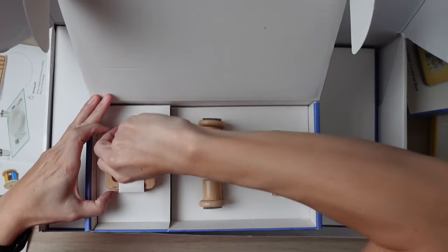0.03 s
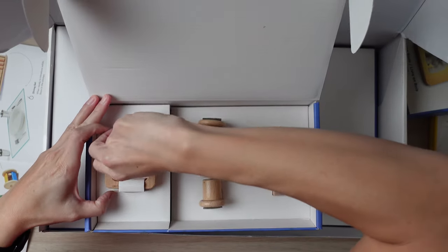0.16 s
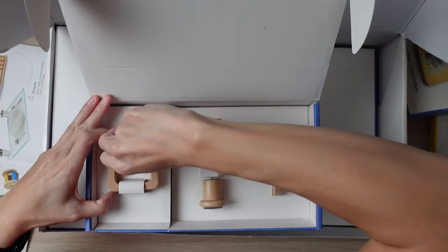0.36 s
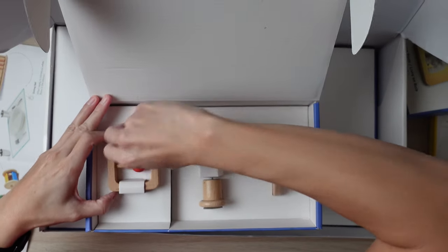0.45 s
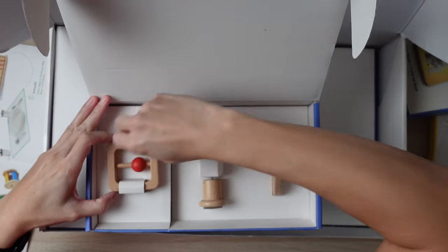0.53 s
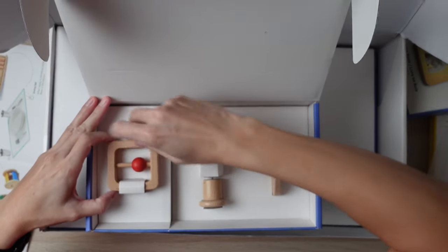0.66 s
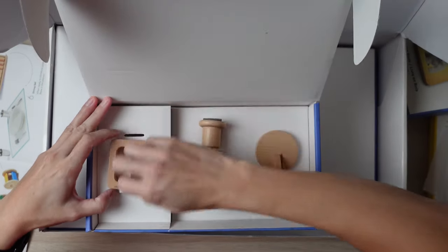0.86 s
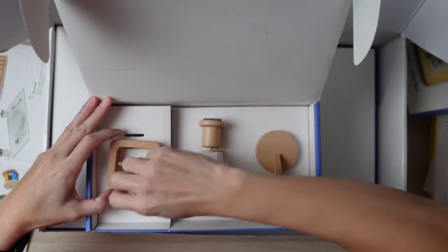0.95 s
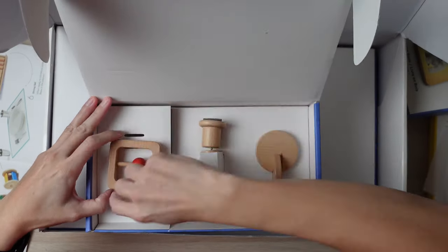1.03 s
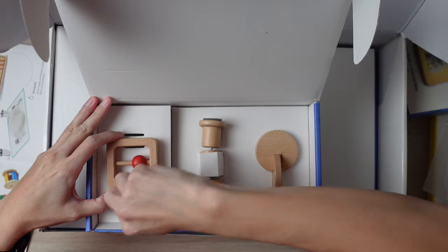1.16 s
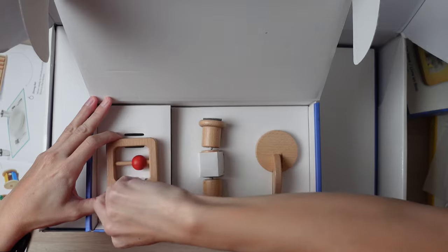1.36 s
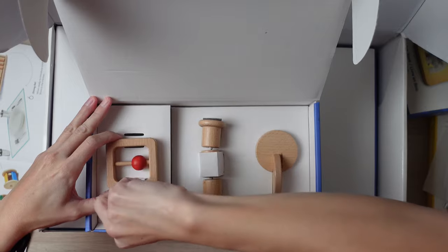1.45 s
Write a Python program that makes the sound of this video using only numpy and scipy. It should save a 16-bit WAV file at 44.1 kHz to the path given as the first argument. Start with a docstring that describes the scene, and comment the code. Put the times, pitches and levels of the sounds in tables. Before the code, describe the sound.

A wooden toy is worked against a tight cardboard slot: faint taps near 0.07 s, then a dense, loud burst of scraping and sharp woody clacks from 0.17 to 0.28 s. Hollow box knocks and a low wobble follow until 0.7 s. Dry, grainy finger brushes run from 0.4 to 1.25 s, firmest around 0.7 and 0.97 s. Another bump comes at 1.12 s, a tiny tick at 1.36 s, over quiet room rumble.

```python
"""Small room, close by: a wooden rattle is worked against the tight slot of a cardboard box insert.
Clacks and scrapes drive the toy's decaying modes, with coloured noise for torn and crushed card.
The box wobbles (slow sine, low noise) and gives hollow knocks (panel and box modes).
Fingers brush the card (resonant, grainy noise) and the box is bumped again.
A hand rustles on the box and the room rumbles quietly (coloured noise)."""
import sys
import numpy as np
from scipy import signal
from scipy.fft import rfft, irfft
from scipy.io import wavfile
from scipy.ndimage import uniform_filter1d

SR = 44100
rng = np.random.default_rng(int(sys.argv[2]) if len(sys.argv) > 2 else 0)


def wrap_up_sound(samples):
    """Save the sound to the file named by the first command line argument, as 16-bit audio."""
    columns = np.atleast_2d(samples).T
    # keep every value between -1 and 1, then stretch to whole-number steps
    tamed = np.clip(columns, -1, 1)
    steps = np.round(tamed * 32767).astype(np.int16)
    wavfile.write(sys.argv[1], SR, steps)


N = 66150
TIME_S = np.arange(N) / SR

# Spectra: noise is scaled to unit rms, so their levels are relative.
# room rumble: [f/Hz, level/dB]
FLOOR_SPECTRUM = [(20, -9), (60, 12), (110, -7), (250, -18.5), (1000, -36), (4000, -38), (16000, -36.5)]
FLOOR_DB = -47

# hand shifting on the box: [t/s, level/dB]
HANDLING_LEVEL = [(0, -50.5), (.3, -43), (.66, -52.5), (.76, -46.5), (.785, -40.5), (.81, -56.5),
                  (1.09, -65), (1.15, -48), (1.315, -51), (1.36, -53.5), (1.5, -47.5)]
# colour of its rustle: [f/Hz, level/dB]
RUSTLE_SPECTRUM = [(100, 6.5), (220, -4.5), (400, 1), (1100, -2), (2200, -12.5), (4000, -12.5),
                   (7000, -27.5), (16000, -41.5)]

# wobble of the box: [t/s, level/dB]
WOBBLE_LEVEL = [(0, -41.5), (.12, -31), (.24, -56), (.275, -13), (.36, -16), (.45, -24), (.6, -33.5),
                (.74, -38), (1.08, -47), (1.24, -32.5), (1.29, -45.5), (1.5, -41.5)]
# stirred air: [f/Hz, level/dB]
AIR_SPECTRUM = [(20, -15), (58, 23), (85, -7.5), (300, -51)]
SWAY_HZ, SWAY_WANDER_RMS_HZ = 29.9, 1
SWAY_DB, AIR_DB = -5.5, -6

# finger strokes: [start t/s, length/s, mid-stroke level/dB, swell over stroke/dB, low-pass f/Hz]
BRUSH_STROKES = [(0.393, 0.07, -46.5, -17, 7700), (0.496, .022, -43.5, -25, 6600),
                 (0.55, 0.032, -46, -6, 11500), (0.6, 0.047, -49, -21, 11900),
                 (0.652, 0.064, -43, 6, 12900), (0.714, 0.012, -26, -11, 4500),
                 (0.733, 0.13, -47, -1, 6500), (0.837, 0.058, -42, -3.5, 10010),
                 (0.908, 0.055, -39.5, 7.5, 8600), (0.964, 0.019, -30, 10, 7400),
                 (0.986, 0.024, -41.5, 7, 9000), (1.037, 0.046, -45.5, -5.5, 6500),
                 (1.093, 0.17, -48.5, -12, 4920)]
# friction of skin on card: [f/Hz, level/dB]
SKIN_SPECTRUM = [(1200, -5), (2600, -14), (4100, -9), (5400, -2), (7000, -4), (8300, -1), (10500, -6),
                 (16000, 0)]
# resonance of the gap between hand and card: [t/s, f/Hz]
GAP_RESONANCE = [(.86, 3400), (.965, 2700), (1.05, 2460)]
GAP_Q = 3.67
BRUSH_ATTACK_S, BRUSH_RELEASE_TAU_S, BRUSH_GRAIN_DB = 0.013, 0.0059, 1.5
CHATTER_HZ, CHATTER_Q, CHATTER_DB = 5360, 6.6, 4.5

# knocks on the box: [t/s, level/dB, nominal panel f/Hz, low-pass f/Hz, panel t60/s]
BOX_KNOCKS = [(0.0657, -28.5, 3260, 7540, 0.0071), (0.067, -27, 556, 2510, 0.023),
              (0.27, -15.5, 610, 2480, 0.011), (0.3217, -18, 658, 1950, 0.0087),
              (0.3556, -23, 1016, 4600, 0.025), (0.36, -17, 570, 2940, 0.038),
              (0.365, -22, 373, 1770, 0.061), (0.4038, -23.5, 930, 1940, 0.0078),
              (0.5151, -14.5, 1145, 2050, 0.016), (0.5969, -23, 904, 1930, 0.016),
              (.6005, -27, 360, 1000, 0.017), (0.693, -41, 188, 800, 0.051),
              (1.1212, -20.5, 953, 4340, 0.02), (1.1250, -27, 340, 1680, 0.041),
              (1.1416, -27.5, 1070, 1990, 0.0092), (1.355, -32.5, 3600, 4900, .008)]
# modes of the box: [nominal f/Hz, level/dB, t60/s]
BOX_MODES = [(322, -23, 0.097), (375, -17, 0.11), (460, -31.5, 0.096), (570, -11.5, 0.025),
             (675, -23.5, 0.18), (824, -21, 0.07)]
# overtones of a card panel: [multiple of panel f, level/dB]
PANEL_OVERTONES = [(1.6, -16), (2.2, -11), (3.1, -15.5)]
PANEL_DB, TAP_DB, TAP_T60_S = 0.5, -7, 0.032

# crushed and scraped card: [f/Hz, level/dB]
CARD_SPECTRUM = [(200, -22), (500, 0.5), (1600, -1.5), (2400, -7), (4800, -9.5), (9200, -18), (10800, -28),
                 (16000, -17.5)]
# modes of the toy wedged in the card: [nominal f/Hz, level/dB, t60/s]
TOY_MODES = [(150, -29, 0.06), (645, -14, 0.035), (1040, -11.5, 0.016), (1600, -8, 0.013),
             (1970, -20, 0.012), (3690, -17, 0.008), (4920, -22, 0.009), (8730, -23, 0.004)]
DETUNE_MAX = 0.034  # +/- share by which modes shift per blow as the grip changes

# force of wood scraping on card: [t/s, level/dB]
SCRAPE_FORCE = [(0, -42.5), (.09, -68), (.118, -36), (.15, -97.5), (.171, -27.5), (.203, -35), (.216, -26),
                (.243, -21.5), (.272, -16.5), (.288, -29.5), (.315, -32), (.49, -72)]
SLIPS_PER_S, SLIP_SPREAD_DB, SCRAPE_LOWPASS_HZ = 1800, 2.5, 11500
GRIT_DB, GRIT_RISE_DB_PER_DB = -2, 0.2  # harder scraping tears more fibres

# wood catches and strikes: [t/s, level/dB, knock f/Hz, low-pass f/Hz]
WOOD_CLACKS = [(.1755, -15.5, 1660, 3030), (.2124, -7.5, 1450, 3200), (0.2143, -2, 1520, 10950),
               (0.2160, -2.5, 950, 2000), (.2194, -8.5, 680, 2000), (.2338, -12.5, 1420, 3000),
               (.2366, 3, 1560, 11800), (0.2385, -8.5, 1870, 4900), (.2443, -13.5, 1240, 8000),
               (.2490, -8.5, 1120, 3000), (.2555, -13, 930, 2500), (.2585, -13, 1300, 11240),
               (0.265, -7.5, 1890, 13900), (.2663, -6, 1065, 5950), (.2767, -7.5, 1360, 2520)]
CRACK_DB, CRACK_T60_S, CLACK_T60_S = -2.5, 0.014, 0.011

ROOM_T60_S, ROOM_DB, ROOM_LOWPASS_HZ, ROOM_DELAY_S = 0.12, -16, 4930, 0.004
CUTOFF_HZ, CLIP_LEVEL = 15750, 0.88


def from_db(db):
    """Decibels to gain."""
    return 10 ** (np.asarray(db) / 20)


def rms_one(x):
    """Scale to unit rms."""
    return x / np.sqrt(np.mean(x ** 2))


def energy_one(x):
    """Scale to unit energy."""
    return x / np.sqrt(np.sum(x ** 2))


def interpolate(at, points):
    """Linear interpolation between (x, y) points."""
    return np.interp(at, *np.transpose(points))


def level(points):
    """Gain over time from [t/s, level/dB]."""
    return from_db(interpolate(TIME_S, points))


def fade(t60_s):
    """Exponential decay, -60 dB at t60."""
    return np.exp(-np.log(1000) * TIME_S / t60_s)


def delayed(x, delay_s):
    """Shift later, keeping N samples."""
    return np.concatenate([np.zeros(int(delay_s * SR)), x])[:N]


def soften(x, cutoff_hz):
    """Two-pole low-pass."""
    return signal.sosfilt(signal.butter(2, cutoff_hz, fs=SR, output="sos"), x)


def noise(spectrum):
    """Unit-rms noise, level interpolated over log frequency."""
    f_hz, level_db = np.transpose(spectrum)
    bins_hz = np.maximum(np.fft.rfftfreq(N, 1 / SR), 1)
    gain = from_db(np.interp(np.log(bins_hz), np.log(f_hz), level_db))
    return rms_one(irfft(rfft(rng.standard_normal(N)) * gain, N))


def grain(depth_rms_db, size):
    """Random gain flutter of a friction, smoothed over size samples."""
    return from_db(depth_rms_db * rms_one(uniform_filter1d(rng.standard_normal(N), size)))


def ringing(modes):
    """Response of a body to one blow: decaying modes, alternating in sign, randomly detuned."""
    out = np.zeros(N)
    for k, (f_hz, level_db, t60_s) in enumerate(modes):
        mode_hz = f_hz * (1 + DETUNE_MAX * rng.uniform(-1, 1))
        out += (-1) ** k * from_db(level_db) * fade(t60_s) * np.sin(2 * np.pi * mode_hz * TIME_S)
    return out


def floor_rumble():
    """Quiet steady rumble of the room."""
    return from_db(FLOOR_DB) * noise(FLOOR_SPECTRUM)


def handling():
    """Soft, dull rustle of the hand that steadies the box."""
    return level(HANDLING_LEVEL) * noise(RUSTLE_SPECTRUM) * grain(3.5, size=700)


def wobble():
    """The box sways at a low, wandering rate and stirs the air around it."""
    wander = rms_one(uniform_filter1d(rng.standard_normal(N), 1200))
    rate_hz = SWAY_HZ + SWAY_WANDER_RMS_HZ * wander
    sway = rms_one(np.sin(2 * np.pi * np.cumsum(rate_hz) / SR))
    air = noise(AIR_SPECTRUM)
    return level(WOBBLE_LEVEL) * (from_db(SWAY_DB) * sway + from_db(AIR_DB) * air)


def patchy(x, depth_rms_db, size):
    """Half-octave bands above 2 kHz waver independently; everything below wavers as one."""
    octaves = np.log2(np.maximum(np.fft.rfftfreq(N, 1 / SR), 2000) / 2000)
    bands, spectrum = np.round(2 * octaves), rfft(x)
    out = np.zeros(N)
    for band in np.unique(bands):
        out += irfft(spectrum * (bands == band), N) * grain(depth_rms_db, size)
    return out


def hollow(x, f_hz):
    """Gap under the hand: resonant two-pole high-pass at f_hz."""
    w = 2 * np.tan(np.pi * f_hz / SR)
    return signal.lfilter(*signal.bilinear([1, 0, 0], [1, w / GAP_Q, w * w]), x)


def brushes():
    """Grainy skin friction rings in the gap under the hand; firm pressure adds chatter."""
    out, pressure = np.zeros(N), np.zeros(N)
    friction = patchy(noise(SKIN_SPECTRUM), 1.52, size=900) * grain(BRUSH_GRAIN_DB, size=70)
    for start_s, length_s, level_db, swell_db, lowpass_hz in BRUSH_STROKES:
        t_s = TIME_S - start_s
        attack = np.clip(t_s / BRUSH_ATTACK_S, 0, 1)
        release = np.exp(-np.maximum(t_s - length_s, 0) / BRUSH_RELEASE_TAU_S)
        swell = from_db(level_db + swell_db * (np.clip(t_s / length_s, 0, 1) - 0.5))
        envelope = attack * release * swell
        gap_hz = interpolate(start_s, GAP_RESONANCE)
        out += envelope * soften(hollow(friction, gap_hz), lowpass_hz)
        pressure += envelope
    chatter = signal.lfilter(*signal.iirpeak(CHATTER_HZ, CHATTER_Q, fs=SR), out)
    return out + from_db(CHATTER_DB) * chatter * pressure / pressure.max()


def knocks():
    """A tap rings the struck panel, whose overtones die sooner, and wakes the hollow box."""
    out = np.zeros(N)
    for t_s, level_db, panel_hz, lowpass_hz, t60_s in BOX_KNOCKS:
        tap = from_db(TAP_DB) * fade(TAP_T60_S) * noise(CARD_SPECTRUM)
        panel_modes = [(panel_hz, 0, t60_s)]
        for ratio, over_db in PANEL_OVERTONES:
            panel_modes.append((panel_hz * ratio, over_db, t60_s / np.sqrt(ratio)))
        body = from_db(PANEL_DB) * ringing(panel_modes) + ringing(BOX_MODES)
        out += from_db(level_db) * delayed(soften(body + tap, lowpass_hz), t_s)
    return out


def scrape():
    """Dense uneven slips excite the toy's modes; grit of card fibres grows with force."""
    slip_hits = rng.random(N) < SLIPS_PER_S / SR
    slips = slip_hits * grain(SLIP_SPREAD_DB, size=1) * np.sign(rng.standard_normal(N))
    force = level(SCRAPE_FORCE)
    toy = energy_one(ringing(TOY_MODES))
    scraped_toy = signal.fftconvolve(rms_one(slips) * force, toy)[:N]
    grit_level = from_db(GRIT_DB) * force * (force / force.max()) ** GRIT_RISE_DB_PER_DB
    grit = grit_level * noise(CARD_SPECTRUM) * grain(1.5, size=50)
    return soften(scraped_toy + grit, SCRAPE_LOWPASS_HZ)


def clacks():
    """Each catch: crack of card, damped knock and toy ring, duller for a softer contact."""
    out = np.zeros(N)
    for t_s, level_db, knock_hz, lowpass_hz in WOOD_CLACKS:
        crack = from_db(CRACK_DB) * fade(CRACK_T60_S) * noise(CARD_SPECTRUM)
        knock = fade(CLACK_T60_S) * np.sin(2 * np.pi * knock_hz * TIME_S)
        blow = knock + crack + ringing(TOY_MODES)
        out += from_db(level_db) * delayed(soften(blow, lowpass_hz), t_s)
    return out


def room(x):
    """Short, dull tail of reflections from lid, table and walls: decaying low-passed noise."""
    tail = soften(rng.standard_normal(N), ROOM_LOWPASS_HZ) * fade(ROOM_T60_S)
    tail = delayed(energy_one(tail), ROOM_DELAY_S)
    return x + from_db(ROOM_DB) * signal.fftconvolve(x, tail)[:N]


def scene():
    """Contact sounds with room tail, over handling, wobble and rumble; one channel."""
    background = floor_rumble() + handling() + wobble()
    contacts = brushes() + knocks() + scrape() + clacks()
    return (background + room(contacts))[None]


def record(dry):
    """Clip at the overload level, then cut the top with a steep low-pass."""
    lowpass = signal.ellip(10, 0.1, 80, CUTOFF_HZ, fs=SR, output="sos")
    return signal.sosfilt(lowpass, np.clip(dry, -CLIP_LEVEL, CLIP_LEVEL))


dry = scene()
out = record(dry)
wrap_up_sound(out)
```